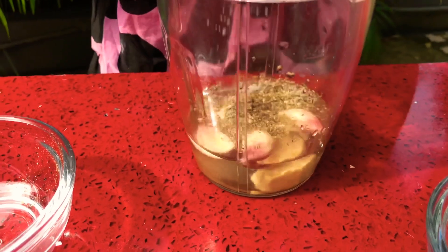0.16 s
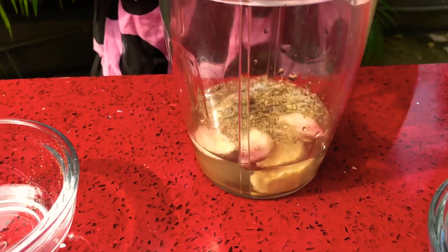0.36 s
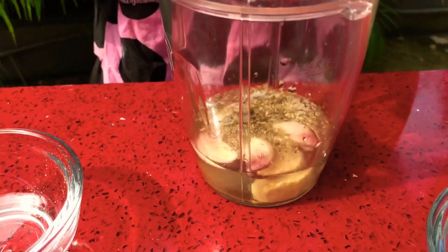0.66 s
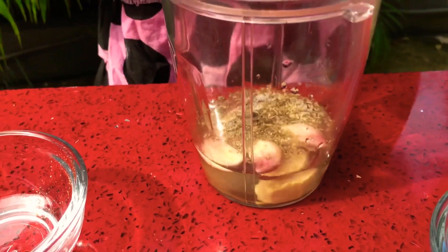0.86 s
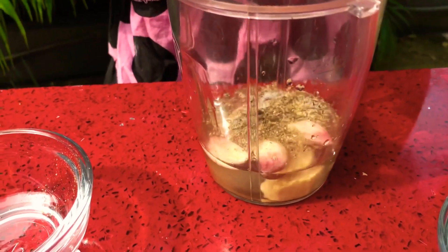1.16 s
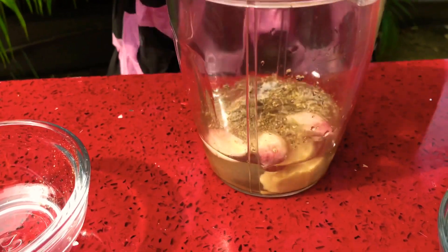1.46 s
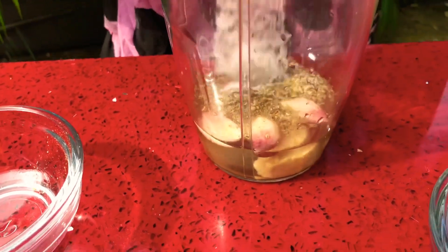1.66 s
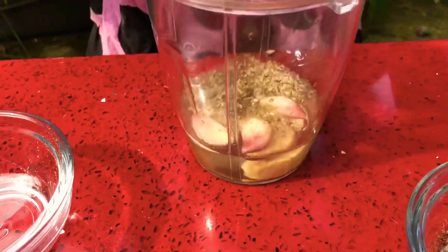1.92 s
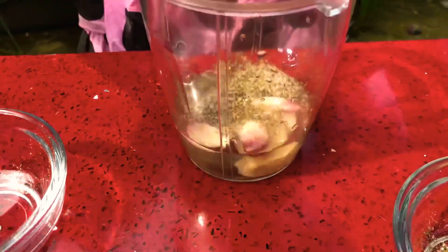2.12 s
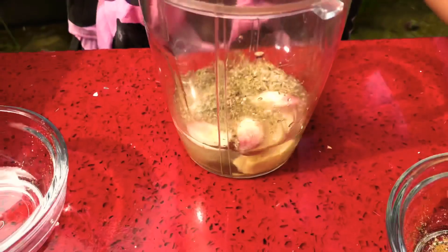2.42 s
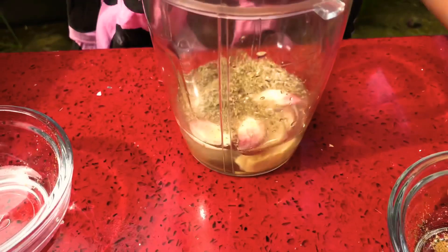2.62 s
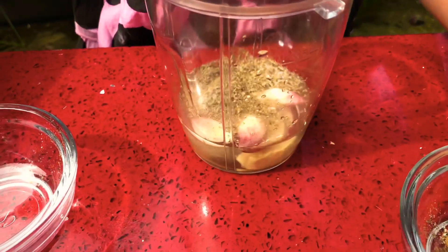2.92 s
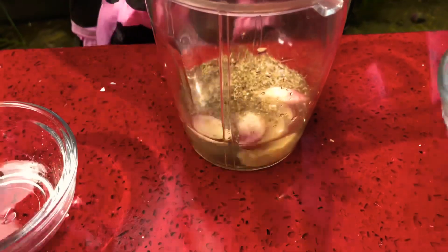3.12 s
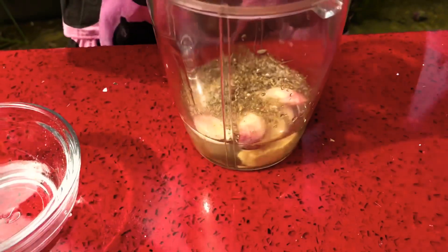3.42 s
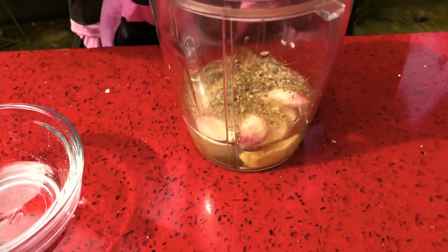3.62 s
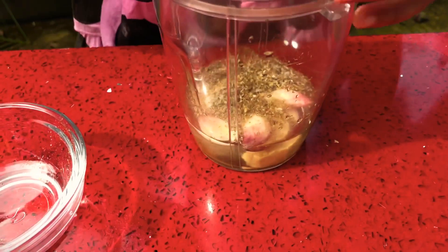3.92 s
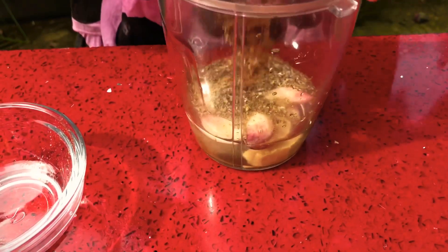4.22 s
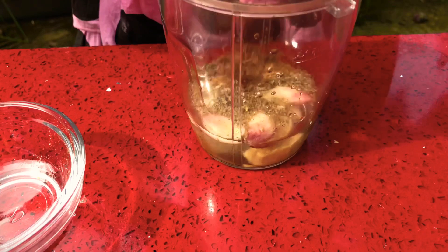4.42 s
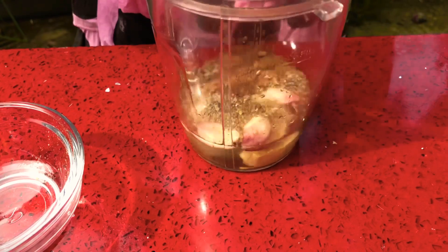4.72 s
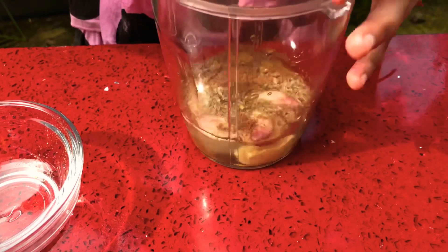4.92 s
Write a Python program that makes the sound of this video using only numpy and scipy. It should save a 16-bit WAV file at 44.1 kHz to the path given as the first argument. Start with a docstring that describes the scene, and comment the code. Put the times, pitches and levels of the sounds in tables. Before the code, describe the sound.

Faint spice trickles and distant bird chirps, then a small glass bowl clatters on stone and taps hollowly on a plastic blender jar's rim.

```python
"""Open-air kitchen, stone counter: spices go into a plastic blender jar.
Powder trickles in as showers of noise grains; further off a hoarse screech of unsteady harmonics
dies away and a small bird chirps in swept whistles, over a steady wash and an uneven low rumble.
A small glass bowl clatters on the counter and rings as it is lifted, built from damped modes and noise;
it is then tapped on the jar's rim, which clicks and sets the air in the jar booming."""
import sys
import numpy as np
from scipy import signal
from scipy.fft import rfft, irfft
from scipy.io import wavfile

SR = 44100
rng = np.random.default_rng(int(sys.argv[2]) if len(sys.argv) > 2 else 0)


def wav_out(sig):
    """Save sig, one row per channel (or a flat mono array), as 16-bit PCM at SR to the path in sys.argv[1]."""
    wavfile.write(sys.argv[1], SR, np.round(np.clip(np.atleast_2d(sig).T, -1, 1) * 32767).astype(np.int16))


N = 223696
TIME = np.arange(N) / SR
HIT_TIME = TIME[:SR // 2]   # every blow is given half a second


def from_db(db):
    """Decibels to gain."""
    return 10 ** (np.asarray(db) / 20)


def rms_one(x):
    """Scale to unit rms."""
    return x / np.sqrt(np.mean(x ** 2) + 1e-20)


def fade(t, t60):
    """Exponential decay that falls 60 dB in t60 seconds."""
    return np.exp(-np.log(1000) * t / t60)


def at_hz(points, hz):
    """Read a (frequency [Hz], value) table on a log-frequency axis."""
    knots, values = np.transpose(points)
    return np.interp(np.log(np.maximum(hz, 1)), np.log(knots), values)


def colour(x, spectrum):
    """Give a steady sound a spectrum; rms 1."""
    gain = from_db(at_hz(spectrum, np.fft.rfftfreq(len(x), 1 / SR)))
    return rms_one(irfft(rfft(x) * gain, len(x)))


def soften(x, hz):
    """Low-pass: a softer contact passes less treble."""
    low_pass = signal.butter(2, min(hz, .45 * SR), fs=SR, output="sos")
    return signal.sosfilt(low_pass, x + 1e-18)


def cut_bass(x, hz):
    """High-pass: the deepest bass is taken away."""
    return signal.sosfilt(signal.butter(2, hz, "high", fs=SR, output="sos"), x)


def add(track, s, sound):
    """Mix a sound in at s seconds."""
    start = int(np.clip(round(s * SR), 0, N - 1))
    track[start:start + len(sound)] += sound[:N - start]


def ring(modes):
    """One blow on a set of damped modes of alternating sign."""
    blow = 0
    for k, (hz, db, t60) in enumerate(modes):
        tone = np.sin(2 * np.pi * hz * HIT_TIME) * fade(HIT_TIME, t60)
        blow = blow + (-1) ** k * from_db(db) * tone
    return blow


def crack(spectrum, t60, tail_db, tail_t60, tail_hz):
    """Countless damped modes: a sharp burst and a duller tail, with the same energy in every blow."""
    noise = colour(rng.standard_normal(len(HIT_TIME)), spectrum)
    burst = fade(HIT_TIME, t60)
    tail = from_db(tail_db) * fade(HIT_TIME, tail_t60) * soften(noise, tail_hz)
    return rms_one(noise * burst + tail) * np.sqrt(np.mean(burst ** 2))


# spectrum of the steady outdoor wash: (frequency [Hz], density [dB per Hz])
WASH_COLOUR = [(12, -54), (20, -37), (37, -14.5), (60, -2.5), (101, -4), (127, -9), (241, -7.5), (388, -19),
               (624, -14), (873, -23), (1290, -23.5), (2670, -32), (3250, -31.5), (5380, -37.5),
               (16000, -47)]
WASH_DB = -53.5
# spectrum of the low rumble: (frequency [Hz], density [dB per Hz])
RUMBLE_COLOUR = [(12, -34.5), (25, -13), (50, -2), (85, -3.5), (140, -22), (400, -54.5)]
# how the rumble rises and falls: (time [s], level [dB])
RUMBLE_LEVEL = [(0, -47.5), (.6, -60.5), (.9, -49), (1.3, -69), (1.7, -55), (2.1, -70), (5.07, -74.5)]


def outdoors():
    """Shaped noise: the steady wash of the surroundings and a low rumble of changing level."""
    wash = from_db(WASH_DB) * colour(rng.standard_normal(N), WASH_COLOUR)
    rumble_db = np.interp(TIME, *np.transpose(RUMBLE_LEVEL))
    return wash + from_db(rumble_db) * colour(rng.standard_normal(N), RUMBLE_COLOUR)


# spectrum of the far screech: (frequency [Hz], density [dB per Hz])
SCREECH_COLOUR = [(300, -10), (480, 0), (700, -14), (950, -1), (1080, -8), (1280, 4.5), (1680, 2.5),
                  (2000, -2.5), (3250, -3.5), (3650, -6.5), (4000, -5), (6000, -9.5), (7800, -19.5),
                  (16000, -30)]
# it slides down in pitch, sags in level and is released; level before the mix
SCREECH_START_HZ, SCREECH_END_HZ, SLIDE_S, SLIDE_STEEPNESS = 817, 575, .16, 3.2
SCREECH_DB, SAG_DB_PER_S, RELEASE_S, RELEASE_DB_PER_S = -44.5, 32, 0.25, 32


def screech(jitter, rasp_width_hz):
    """A falling stack of unsteady harmonics; alternate cycles differ, which puts weaker lines between them."""
    slide = 1 + (TIME / SLIDE_S) ** SLIDE_STEEPNESS
    pitch = SCREECH_END_HZ + (SCREECH_START_HZ - SCREECH_END_HZ) / slide
    db = SCREECH_DB - SAG_DB_PER_S * TIME - RELEASE_DB_PER_S * np.maximum(TIME - RELEASE_S, 0)
    unsteady = 1 + jitter * rms_one(soften(rng.standard_normal(N), 210))
    phase = 2 * np.pi * np.cumsum(pitch * unsteady) / SR
    stack = 0
    for k in range(1, 21):
        flutter = 1 + 1.2 * rms_one(soften(rng.standard_normal(N), rasp_width_hz))
        line = np.sin(k * phase / 2 + rng.uniform(0, 2 * np.pi))
        stack = stack + from_db(-4 * (k % 2)) * flutter * line   # odd k: the lines in between
    rasp = from_db(2) * rng.standard_normal(N)
    return from_db(db) * colour(rms_one(stack) + rasp, SCREECH_COLOUR)


# pinches of spice trickling: (middle time [s], Gaussian spread [s], level before the mix [dB])
TRICKLES = [(0.115, 0.06, -56), (0.709, 0.021, -60), (1.147, 0.016, -61), (1.297, 0.0085, -57),
            (1.65, 0.049, -52.5), (2.133, 0.012, -61), (4.29, 0.077, -63.5)]
# spectrum of the grains: (frequency [Hz], density [dB per Hz])
TRICKLE_COLOUR = [(1500, -9), (3200, 6.5), (5000, -2.5), (7000, -3.5), (10000, -5), (13000, 0.5),
                  (16000, -5)]
# stray flakes drop at random times in this span; level before the mix
STRAY_SPAN_S, STRAY_SPREAD_S, STRAY_DB = (0.407, 2.5), 0.0092, -66


def spice(grain_db):
    """Fine grains of uneven size land in short showers."""
    strays = [(s, STRAY_SPREAD_S, STRAY_DB) for s in rng.uniform(*STRAY_SPAN_S, size=5)]
    flow = 0
    for s, spread, db in list(TRICKLES) + strays:
        flow = flow + from_db(db) * np.exp(-((TIME - s) / spread) ** 2 / 2)
    size_db = grain_db * np.minimum(rng.exponential(1, N), 5)
    grains = rng.standard_normal(N) * from_db(size_db)
    return flow * colour(grains, TRICKLE_COLOUR)


# the first chirp of each pair: (time [s], level before the mix [dB])
CHIRPS = [(0.348, -63.5), (.735, -62), (1.025, -61.5), (1.371, -56.5), (1.945, -58.5), (2.261, -58),
          (4.439, -60.5)]
PAIR_GAP_S, SECOND_CHIRP_DB = .117, -2   # the second is softer
# louder chirps climb higher: the sweep is SWEEP_HZ at SWEEP_AT_DB and doubles every SWEEP_DOUBLES_DB
CHIRP_START_HZ, SWEEP_HZ, SWEEP_AT_DB, SWEEP_DOUBLES_DB = 2980, 1060, -61, 4.5


def bird(length_s, waver):
    """Each chirp is a wavering whistle that sweeps upward as it swells and fades; a softer one follows."""
    out, u = np.zeros(N), np.linspace(0, 1, int(length_s * SR))
    seconds = [(s + PAIR_GAP_S, db + SECOND_CHIRP_DB) for s, db in CHIRPS]
    for s, db in list(CHIRPS) + seconds:
        unsteady = 1 + waver * rms_one(soften(rng.standard_normal(len(u)), 300))
        sweep = SWEEP_HZ * 2 ** ((db - SWEEP_AT_DB) / SWEEP_DOUBLES_DB)
        pitch = (CHIRP_START_HZ + sweep * u ** 2) * unsteady
        whistle = np.sin(2 * np.pi * np.cumsum(pitch) / SR)
        add(out, s, from_db(db) * np.sqrt(4 * u * (1 - u)) * whistle)
    return out


# the bowl is set down and bounces
DROP_S, DROP_DB, DROP_BRIGHT_HZ = 2.6936, -13.5, 9000
FIRST_HOP_S, RESTITUTION, HOP_LOSS_DB, HOP_DULLING = .0365, .565, 5, 0.74


def bounces(count):
    """Contacts of the settling bowl, each hop shorter, weaker and duller: (s, dB, brightness Hz)."""
    contacts = []
    for k in range(count):
        s = DROP_S + FIRST_HOP_S * (1 - RESTITUTION ** k) / (1 - RESTITUTION)
        contacts.append((s, DROP_DB - HOP_LOSS_DB * k, DROP_BRIGHT_HZ * HOP_DULLING ** k))
    return contacts


# the bowl knocks the counter as it is picked up: (time [s], level [dB], contact brightness [Hz])
KNOCKS = [(2.8644, -22.5, 830), (2.892, -26, 1860), (2.9018, -20.5, 4240)]
# bowl and counter in contact: (frequency [Hz], level [dB], t60 [s])
BOWL_MODES = [(277, -17, 0.078), (469, -13, 0.14), (572, -4.5, 0.056), (697, -7.5, 0.023),
              (1062, -16, 0.065), (1137, -10, 0.068), (1418, -12, 0.051), (1512, -13.5, 0.078),
              (1600, -3, 0.028), (2016, -0.5, 0.019), (2186, -1, 0.0091), (2180, -2, 0.034),
              (2367, -1.6, 0.013), (2730, 5.5, 0.016), (2640, 1.5, 0.0064), (2830, -16.5, 0.089),
              (2947, 6, 0.012), (3300, 0.5, 0.012), (3500, -14, 0.017), (3570, -10, 0.023),
              (3643, -10.5, 0.042), (4030, -11, 0.025), (4300, -13, 0.038), (4620, -11.5, 0.0099),
              (5040, -21.5, 0.035), (5260, -13.5, 0.01), (6770, -14, 0.031), (8600, -24.5, 0.017),
              (15180, -22, 0.04)]
# spectrum of the knock's grit: (frequency [Hz], density [dB per Hz])
KNOCK_COLOUR = [(88, -52.5), (150, -13.5), (406, -5.5), (475, -16), (702, 7), (854, -15), (1100, -0.5),
                (1290, -15.5), (1560, -2), (1900, -10.5), (2980, -0.5), (5680, -44), (6910, -14.5),
                (7470, -58.5), (16000, -55)]
# spectrum of a hard click, for the bowl and the jar's rim: (frequency [Hz], density [dB per Hz])
CLICK_COLOUR = [(200, 5.5), (900, 3.5), (1400, -1.5), (2000, -5.5), (3100, 4), (4400, -6), (5800, -12.5),
                (7000, -7), (10000, -8.5), (16000, -12)]
# the bowl ringing in the hand: (time [s], level [dB], t60 of the fingers' damping [s])
CHIMES = [(2.9, -25.5, 2.5), (4.371, -42.5, 0.043)]
# the bowl free of the counter: (frequency [Hz], level [dB], t60 [s])
FREE_MODES = [(2882, -3, 0.26), (6900, -31.5, 0.16), (11950, -46.5, .1), (15120, -46, .06)]


def glass_bowl():
    """The bowl bounces, damped by the stone; once lifted its free modes ring, the lowest loudest and longest."""
    out, body = np.zeros(N), ring(BOWL_MODES)
    for s, db, bright_hz in bounces(count=5) + list(KNOCKS):
        grit = from_db(2.5) * crack(KNOCK_COLOUR, t60=0.018, tail_db=-7.5, tail_t60=0.12, tail_hz=4500)
        snap = from_db(-19) * crack(CLICK_COLOUR, t60=0.02, tail_db=-21.0, tail_t60=.04, tail_hz=9000)
        add(out, s, from_db(db) * soften(body + grit + snap, bright_hz))
    for s, db, held_t60 in CHIMES:
        add(out, s, from_db(db) * ring(FREE_MODES) * fade(HIT_TIME, held_t60))
    return out


# the bowl lands squarely on the jar's rim: (time [s], boom level [dB], contact brightness [Hz])
TAPS = [(3.9201, -30, 4500), (4.059, -30.5, 4000), (4.0752, -18.5, 8600), (4.1613, -36.5, 5000),
        (4.2408, -21, 9500), (4.281, -32, 3500), (4.2889, -10, 2920), (4.4501, -35, 3600),
        (4.6539, -13, 13000), (4.6744, -18.5, 9200), (4.685, -8, 5040), (4.717, -11.5, 5800),
        (4.8636, -15.5, 8500), (4.8874, 0.74, 5050), (4.8976, -6.5, 6500), (4.9272, -16.5, 3700),
        (5.0432, -19.5, 8650), (5.055, -24, 4000), (5.0661, -5.5, 3500)]
# its edge only grazes the rim, a bright click with hardly any boom: (time [s], click level [dB])
GRAZES = [(3.9084, -44), (4.0529, -48), (4.679, -37), (4.6817, -25.5), (4.711, -37), (4.879, -17.5),
          (4.891, -24.5), (4.9135, -40), (5.0627, -28)]
GRAZE_BRIGHT_HZ, GRAZE_BOOM_DB = 15500, -9   # boom relative to the graze's click
CLICK_DB, CLICK_LEAD_S = -15, .0014   # the rim's click, relative to the boom that follows it
REBOUND_S, REBOUND_LOSS_DB, REBOUND_DULLING = .0184, 18.5, 0.67   # every tap falls back once


def rim_contacts():
    """Taps, their rebounds and the grazes: (s of the click, click dB, brightness Hz, boom dB)."""
    rebounds = [(s + REBOUND_S, db - REBOUND_LOSS_DB, hz * REBOUND_DULLING) for s, db, hz in TAPS]
    square = [(s - CLICK_LEAD_S, db + CLICK_DB, hz, db) for s, db, hz in list(TAPS) + rebounds]
    return square + [(s, db, GRAZE_BRIGHT_HZ, db + GRAZE_BOOM_DB) for s, db in GRAZES]


# the air in the jar and the stiffer wall modes that it drives: (frequency [Hz], level [dB], t60 [s])
AIR_MODES = [(553, 2.5, 0.035), (603.6, 3.5, 0.051), (661, -15, 0.016), (713, -27.5, 0.19),
             (958, -25, 0.073), (1122, -24.5, 0.055), (1496, -19.5, 0.02)]
# the jar flexing on its base: (frequency [Hz], relative level [dB], t60 [s])
BASE_MODES = [(147, -11.5, 0.063), (221.6, -8, 0.1), (310.5, -2.5, 0.083), (359.4, -7, 0.15),
              (443, 1, 0.041), (459.6, -9.5, 0.14)]
# the rim's short, high modes: (frequency [Hz], relative level [dB], t60 [s])
RIM_MODES = [(1910, -14, 0.049), (2710, -11.5, 0.042), (3032, -7.5, 0.038), (3460, -6.5, 0.019),
             (4350, -4, 0.022), (5280, -12, 0.031), (6790, -1.5, 0.016), (8620, -14, 0.025)]
# spectrum of the jar's thin wall: (frequency [Hz], density [dB per Hz])
WALL_COLOUR = [(150, -26.5), (400, 1.5), (800, -1), (1350, -2), (1900, -12), (2400, 0), (3100, -1),
               (6000, -27)]


def jar(base_db, base_slope):
    """The rim clicks first; then the jar gives way and its two close air modes swell and beat."""
    out, air, rim = np.zeros(N), ring(AIR_MODES), from_db(-2.5) * ring(RIM_MODES)
    # the base's low ring swells in over the first few cycles
    base = from_db(3.0) * ring(BASE_MODES) * (1 - fade(HIT_TIME, t60=0.046))
    for s, click_db, bright_hz, boom_db in rim_contacts():
        snap = from_db(3.5) * crack(CLICK_COLOUR, t60=0.019, tail_db=-18, tail_t60=0.1, tail_hz=6000)
        clack = from_db(-7.5) * crack(WALL_COLOUR, t60=0.037, tail_db=-13.5, tail_t60=0.13, tail_hz=2530)
        add(out, s, from_db(click_db) * soften(rim + snap + clack, bright_hz))
        add(out, s + CLICK_LEAD_S, from_db(boom_db) * air)
        # the base flexes less than in proportion under the harder blows
        add(out, s + CLICK_LEAD_S, from_db(base_db + base_slope * boom_db) * base)
    return out


# decay of the reflections: (frequency [Hz], t60 [s])
ROOM_T60 = [(100, 1), (600, 0.33), (3000, 0.27), (14000, 0.29)]


def room(x, build_up_s):
    """Diffuse reflections from walls and roof: bands of decaying noise, the bass lasting longest."""
    tail = 0
    edges = 60 * 2. ** np.arange(9)   # octave bands
    for low, high in zip(edges, edges[1:]):
        band_pass = signal.butter(2, [low, high], "band", fs=SR, output="sos")
        band = signal.sosfilt(band_pass, rng.standard_normal(len(HIT_TIME)))
        tail = tail + band * fade(HIT_TIME, at_hz(ROOM_T60, np.sqrt(low * high)))
    tail = tail * np.minimum(HIT_TIME / build_up_s, 1) ** 2
    return signal.fftconvolve(x, tail / np.sqrt(np.sum(tail ** 2)))[:N]


def scene():
    """Close, nearly dry blows; distant calls heard largely by reflection."""
    near = cut_bass(glass_bowl() + jar(base_db=-18.5, base_slope=0.49), hz=75)
    hoarse = screech(jitter=.01, rasp_width_hz=60)
    chirps = bird(length_s=0.028, waver=0.032)
    close = near + from_db(-28.5) * room(near, build_up_s=0.013) + from_db(-2.0) * spice(grain_db=5)
    reflected = room(hoarse + from_db(2.6) * chirps, build_up_s=0.003)
    distant = from_db(-0.5) * (hoarse + chirps) + from_db(-2.0) * reflected
    return (close + distant + outdoors())[None]


CUTOFF_HZ = 16200


def record(dry):
    """The loudest peaks are rounded off and the top is cut."""
    rounded = dry / (1 + dry ** 6) ** (1 / 6)
    return signal.sosfilt(signal.ellip(10, .1, 90, CUTOFF_HZ, fs=SR, output="sos"), rounded)


dry = scene()
out = record(dry)
wav_out(out)
```